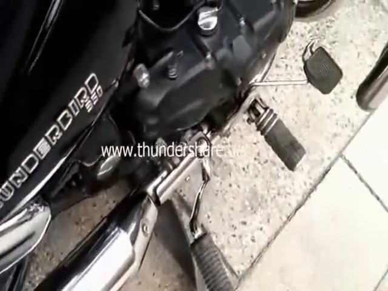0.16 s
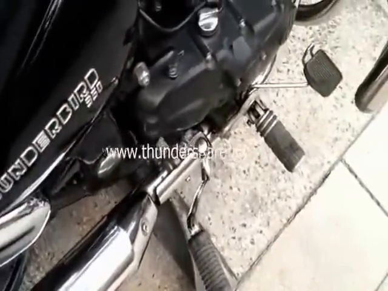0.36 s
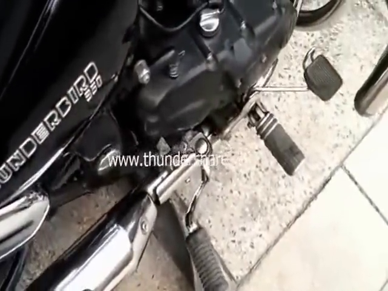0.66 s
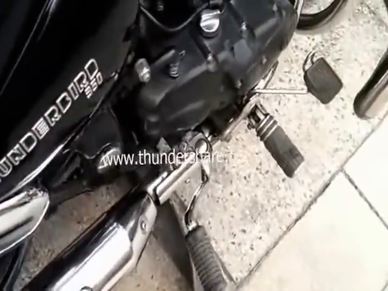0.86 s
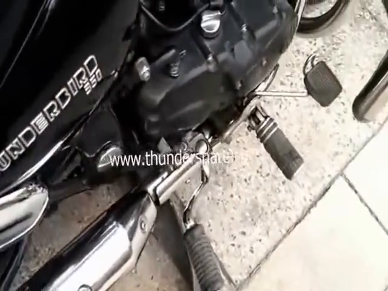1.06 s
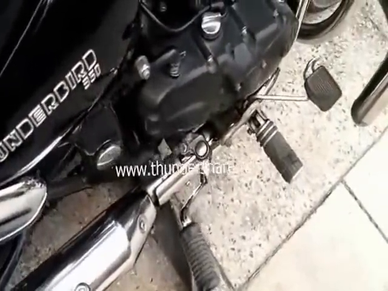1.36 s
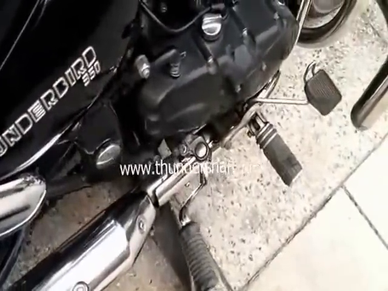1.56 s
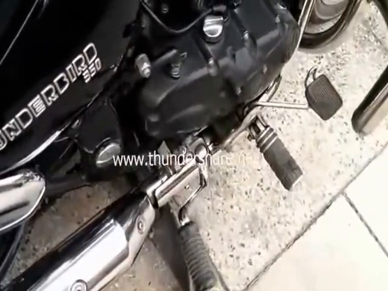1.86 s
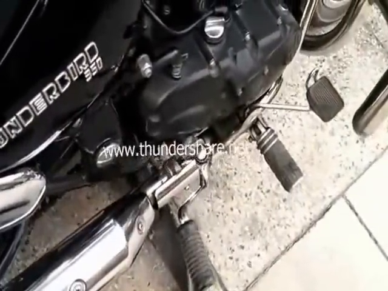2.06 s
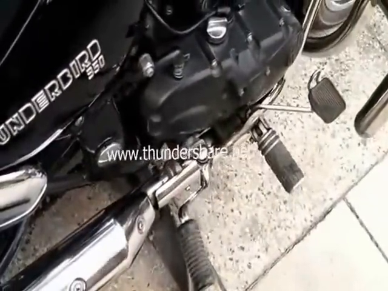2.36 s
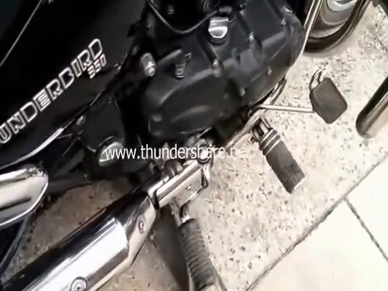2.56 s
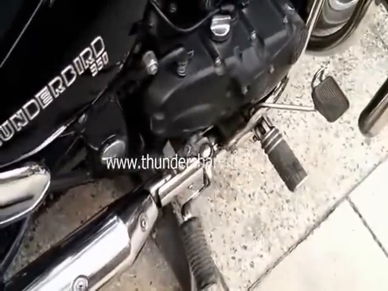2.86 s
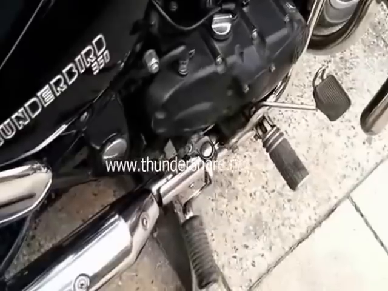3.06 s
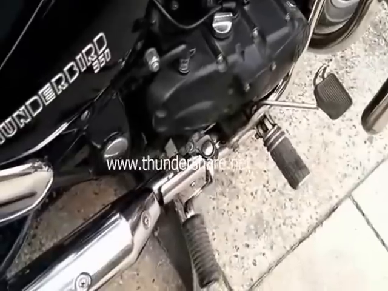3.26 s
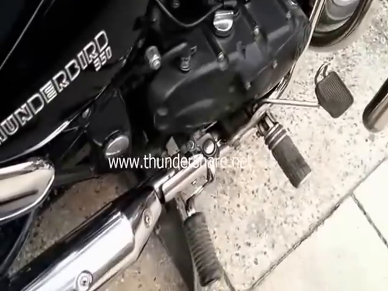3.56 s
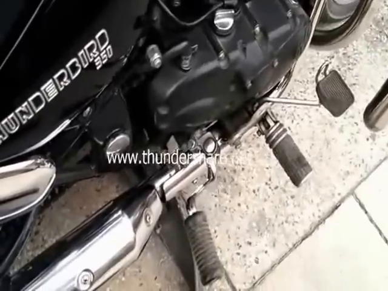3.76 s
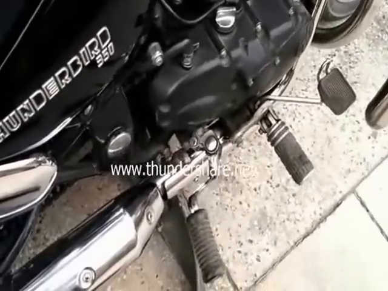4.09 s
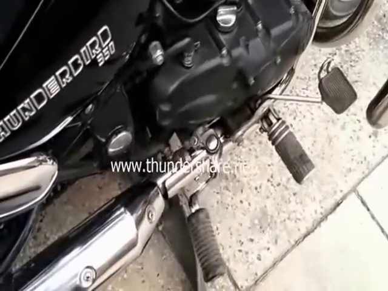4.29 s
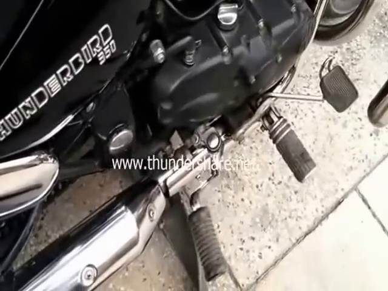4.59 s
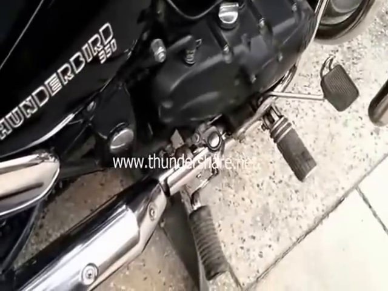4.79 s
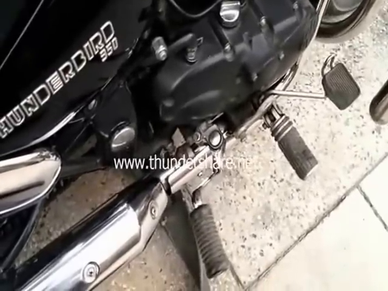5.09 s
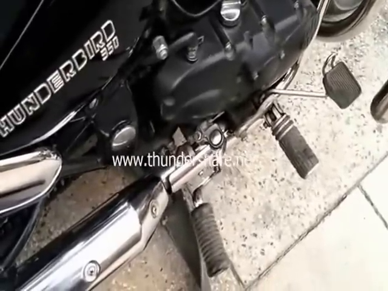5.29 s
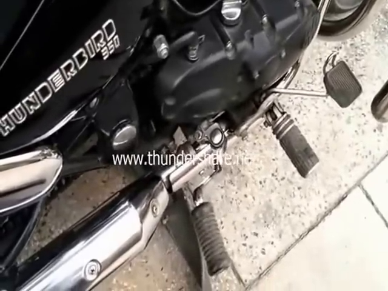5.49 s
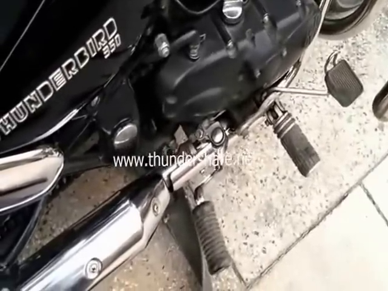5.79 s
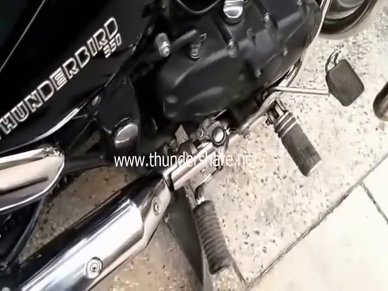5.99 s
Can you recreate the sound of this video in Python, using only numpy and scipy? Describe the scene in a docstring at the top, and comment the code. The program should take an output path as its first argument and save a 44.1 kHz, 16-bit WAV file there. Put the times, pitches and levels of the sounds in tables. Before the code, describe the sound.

Steady but lumpy idling of one large motorcycle cylinder, already running and continuing throughout. Low rounded thumps dominate; over them lie dry knocks, short clacks and a loose crankcase rattle, with gusts of exhaust hiss. The knock hardens and softens over several beats. Between strokes there is low churning and faint airy hiss. Close, dry outdoor sound from a single microphone above the engine, with no revving or stopping.

```python
"""The uneven thump of a motorcycle's single cylinder, a little over five beats a second: it idles cold,
outdoors, with the microphone above the engine. In each four-stroke cycle the firing knocks the cylinder,
the exhaust thumps in the silencer and hisses, then the intake gulps while the valve gear clacks and
rattles the crankcase. Gas pulses ring cavities; metal is shaped noise and decaying modes.
The crank times the knock and the valve gear, so in slow cycles they lie further from the exhaust thump;
intake, frame and hiss follow at fixed delays."""
import sys
import numpy as np
from scipy import signal
from scipy.fft import rfft, irfft, next_fast_len
from scipy.io import wavfile
from scipy.ndimage import uniform_filter1d, map_coordinates

SR = 44100
rng = np.random.default_rng(int(sys.argv[2]) if len(sys.argv) > 2 else 0)


def transcribe(signal):
    """Save signal, clipped to [-1, 1], as a 16-bit WAV file at the path in sys.argv[1]."""
    frames = np.atleast_2d(signal).T
    limited = np.clip(frames, -1, 1)
    pcm = np.round(limited * 32767).astype(np.int16)
    wavfile.write(sys.argv[1], SR, pcm)


N = 270591

# The four-stroke cycles. Each row: exhaust pulse in seconds, then the relative levels in dB of
# the thump, firing knock, valve clack and frame thud.
CYCLES = [(-0.0166, -0.5, -53.5, -45.5, -53), (0.156, -1.5, -45, -41.5, -50.5),
          (0.33, 0.5, -44.5, -44, -47), (0.509, -2, -38.5, -37, -46), (0.6824, -2, -47.5, -43.5, -50),
          (0.9, -0.5, -42, -45, -43.5), (1.0895, -1, -39, -40.5, -48), (1.2639, 1.5, -48.5, -41, -42.5),
          (1.4485, 0, -51.5, -43.5, -49.5), (1.6428, -1, -52.5, -36.5, -48),
          (1.8168, -0.5, -52.5, -38.5, -44.5), (1.9946, -0.5, -58.5, -41, -44),
          (2.1737, -6, -60, -48.5, -48), (2.3936, 0, -62.5, -38, -46.5), (2.5789, 0.5, -45, -40.5, -41),
          (2.7556, 1.5, -40.5, -43, -44), (2.939, 0, -37, -39.5, -44), (3.1184, -8.5, -47.5, -50, -50),
          (3.343, -0.5, -48.5, -42.5, -47), (3.5365, 0.5, -37, -39.5, -44), (3.7113, 0.5, -43, -45, -49),
          (3.907, 0, -45, -39.5, -44), (4.085, 0.5, -47, -42, -47.5), (4.2656, -5, -59.5, -46.5, -51),
          (4.4821, 0, -62.5, -42.5, -42), (4.6668, 0, -62, -47.5, -49), (4.8621, -0.5, -59, -44.5, -48),
          (5.0502, 0.5, -63.5, -40.5, -45.5), (5.2295, 0, -51, -46.5, -46.5), (5.4166, 1, -41, -42.5, -48),
          (5.5936, 0.5, -39, -42.5, -43), (5.7791, 0, -48.5, -43, -50.5), (5.9734, -0.5, -50, -51.5, -48),
          (6.159, 23, -40, -44, -52)]
# Crankcase and cover modes. Each row: frequency in Hz, relative level in dB, 60 dB decay in seconds.
CASE_MODES = [(493, -6, 0.079), (566.7, -8, 0.26), (633, -17, 0.16), (650, -12, 0.18), (785, -5.5, 0.1),
              (1021, -4, 0.17), (1066, 2, 0.062), (1189, -4, 0.083), (1301, -3.5, 0.22),
              (1358.6, 4.5, 0.098), (1467, -27, 0.056), (1661, -1, 0.12), (1670, -17, 0.1),
              (1845, -3.5, 0.14), (1972, -6, 0.081), (2270, -24, 0.39), (2240, -1, 0.03), (2268, -2, 0.079),
              (2260, -54, 0.053), (2774, -11, 0.14), (3160, -21.5, 0.21)]
# Frame and side panel modes. Each row: frequency in Hz, relative level in dB, 60 dB decay in seconds.
FRAME_MODES = [(171.2, 7.5, 0.16), (213.7, -5.5, 0.24), (247.6, -2, 0.13), (284.8, 1, 0.11),
               (355.3, -20, 0.54), (395, -22, 0.17), (439.7, -16.5, 0.34), (515.6, -20, 0.34)]
# Colour of spitting gas and tiny ticks. Each row: frequency in Hz, relative density in dB per Hz.
SPIT_COLOUR = [(2500, 4), (5000, -14), (8000, 0), (11000, 4), (12600, 10), (14000, 6), (15500, -1)]


def thump():
    """The exhaust pushes into the silencer, then the intake sucks on the airbox and the frame shudders."""
    # Silencer resonances. Each row: frequency in Hz, width in Hz, relative level in dB.
    silencer = [(57.3, 26.2, -12.5), (84.7, 35, -9.5), (142.2, 22, -15), (298, 19.8, -7)]
    # Airbox resonances. Each row: frequency in Hz, width in Hz, relative level in dB.
    airbox = [(58.5, 10.8, -20.5), (96.9, 17.4, -5), (117.6, 57, -14)]
    exhaust_width_s, intake_width_s = 0.0013, 0.0025  # standard deviation on the median beat
    s, exhaust_db, *_, thud_db = np.transpose(CYCLES)
    intake_db = 1.2 + 0.23 * exhaust_db - settling(s)
    exhaust = gas_pulses(s, exhaust_db, exhaust_width_s, silencer)
    intake = gas_pulses(s + 0.0404, intake_db, intake_width_s, airbox)
    # while both valves are open a last push of gas precedes the intake
    overlap = gas_pulses(s + 0.0345, intake_db - 16.5, exhaust_width_s, silencer)
    # the frame is jolted by the exhaust stroke, then harder as the load reverses
    jolt = ring(FRAME_MODES, s + 0.0178, thud_db - 2.5, scatter_db=5.5, attack=0.0012)
    shudder = ring(FRAME_MODES, s + 0.041, thud_db + 4.0, scatter_db=5, attack=0.003)
    return exhaust - intake + overlap + jolt + shudder


def firing():
    """Pressure builds, the cold piston slaps the bore and rebounds, and the cylinder rings on."""
    # Colour of the knock. Each row: frequency in Hz, relative density in dB per Hz.
    knock_colour = [(120, -31), (260, -4), (420, 0), (750, 10), (900, 1.5), (1250, 1.5), (1800, 1.5),
                    (2400, -5), (3300, -17.5), (5000, -22.5), (7500, -29.5), (14000, -37)]
    # Brightness of the knocks. Each row: time in seconds, treble over bass in dB.
    knock_tone = [(0.3, -1.5), (0.65, 20), (1.06, 8.5), (1.23, -2), (2.72, -1.5), (2.91, 9), (3.88, 6.5),
                  (5.2, -8.5), (5.56, -1), (5.75, 29.5), (6.13, 13.5)]
    s, db = knocks()
    bright_db = level_at(knock_tone, s)
    metal = patchy(metal_noise(knock_colour)) * chatter(rate=350, depth_db=2.5)

    def envelope(level):
        """A slow build-up of pressure with a sharper blow on top."""
        build_up = bursts(s - 0.011, level - 11.0, rise=0.0033, hold=0.067, t60=0.12)
        blow = bursts(s, level, rise=0.0015, hold=0.016, t60=0.1)
        return build_up + amp(-3.5) * blow

    knock = tilted(metal, envelope, db, bright_db)
    slap = ring(CASE_MODES, s + 0.00103, db - 7, scatter_db=7.5, attack=0.0012)
    rebound = ring(CASE_MODES, s + 0.015, db - 7.5, scatter_db=9, attack=0.0076)
    # at equal level, dull knocks shake the frame most
    shake = ring(FRAME_MODES, s, db - 0.95 * bright_db - 9, scatter_db=3.5, attack=0.0033)
    return knock + slap + rebound + shake


def valve_gear():
    """The valve clacks shut, and the gears rattle as the load reverses."""
    # Colour of the clack. Each row: frequency in Hz, relative density in dB per Hz.
    clack_colour = [(200, 10), (450, -38), (700, 3), (880, -44), (1050, 9.5), (1400, 4.5), (1800, -28),
                    (2400, -7), (2900, -6), (5500, -40), (8000, -42), (15000, -37)]
    # Colour of the rattle. Each row: frequency in Hz, relative density in dB per Hz.
    rattle_colour = [(150, 5), (280, 7), (400, 16), (600, -10), (880, 10), (1100, 21), (1400, 14),
                     (1900, 3), (2350, 19), (2700, 1), (3300, 0), (6000, -57), (12000, -46)]
    # Brightness of clack and rattle. Each row: time in seconds, treble over bass in dB.
    clack_tone = [(0.2, -13), (0.7, 16.5), (3.75, 1.5), (4.0, -14.5), (4.7, -12), (5.3, 6), (6.0, -3.5)]
    s = crank(0.247)  # share of a cycle after the exhaust pulse
    clack_db = np.transpose(CYCLES)[3]
    rattle_db = -48.5 + 0.6 * (clack_db - clack_db.mean())
    bright_db = level_at(clack_tone, s)
    steel = patchy(metal_noise(clack_colour))
    teeth = patchy(metal_noise(rattle_colour))

    def clack_envelope(db):
        """A short clack."""
        return bursts(s - 0.001, db - 3.5, rise=0.0022, hold=0.01, t60=0.1)

    def rattle_envelope(db):
        """A later, slower rattle."""
        return bursts(s + 0.0078, db - 1.5, rise=0.011, hold=0.017, t60=0.23)

    clack = tilted(steel, clack_envelope, clack_db, bright_db)
    rattle = tilted(teeth, rattle_envelope, rattle_db, bright_db)
    case = ring(CASE_MODES, s + 0.00103, clack_db - 6.5, scatter_db=5.5, attack=0.00084)
    # gear teeth cross their backlash a few times, never at quite the same moment
    for delay, db in [(0.013, -28), (0.028, -6), (0.040, -11)]:
        contact_s = s + delay + 0.003 * rng.standard_normal(len(s))
        case += ring(CASE_MODES, contact_s, rattle_db + db, scatter_db=5.0, attack=0.0004)
    return (clack + rattle) * chatter(rate=310, depth_db=3.5) + case


def exhaust_hiss():
    """Gas spits as the valve opens, a tappet ticks, and the stroke hisses on, with a varying bright sizzle."""
    # Colour of the hiss. Each row: frequency in Hz, relative density in dB per Hz.
    hiss_colour = [(300, -11), (700, 1.5), (1400, 9.5), (2900, 2.5), (4400, 9), (5900, 4), (6200, -32),
                   (9000, -4), (15000, -48)]
    # Colour of the sizzle. Each row: frequency in Hz, relative density in dB per Hz.
    sizzle_colour = [(3800, -7), (5300, 1.5), (6000, 2), (6300, -4.5), (6750, 0.5), (7400, -4.5),
                     (7900, -12), (12000, -28)]
    # Course of the hiss. Each row: time in seconds, base level in dB.
    hiss_course = [(0.6, -61), (1.1, -58), (2.55, -54), (2.94, -69.5), (3.35, -57.5), (4.5, -56),
                   (6.0, -65)]
    # Course of the sizzle. Each row: time in seconds, base level in dB.
    sizzle_course = [(0.45, -75), (0.68, -62.5), (1.1, -60.5), (1.27, -67), (1.45, -61), (2.1, -72),
                     (3.3, -74), (3.8, -87), (4.1, -70), (4.65, -60.5), (4.9, -69), (5.5, -63.5),
                     (6.0, -67)]
    s, exhaust_db = np.transpose(CYCLES)[:2]
    hiss_db = level_at(hiss_course, s) + 0.84 * exhaust_db - settling(s)
    sizzle_db = level_at(sizzle_course, s)
    spit_db = -56 + 2.8 * exhaust_db - settling(s)

    tappet = bursts(s + 0.0198, hiss_db + 2.5, rise=0.00063, hold=0.0035, t60=0.033)
    flow = bursts(s - 0.002, hiss_db + 4.0, rise=0.039, hold=0.049, t60=0.21)
    hiss = patchy(metal_noise(hiss_colour)) * (flow + tappet)

    # a hard knock sets off the sizzle early
    knock_s, knock_db = knocks()
    buzz_db = sizzle_db - 2.5 + knock_db - knock_db.mean()
    buzz = bursts(knock_s, buzz_db, rise=0.0018, hold=0.029, t60=0.087)
    stroke = bursts(s - 0.012, sizzle_db + 7, rise=0.014, hold=0.065, t60=0.33)
    sizzle = metal_noise(sizzle_colour) * (buzz + stroke)

    sputter = metal_noise(SPIT_COLOUR) * chatter(rate=250, depth_db=3.5)
    spit = sputter * bursts(s - 0.004, spit_db, rise=0.0028, hold=0.0063, t60=0.21)
    return (hiss + sizzle) * chatter(rate=280, depth_db=3) + spit


def spits_and_ticks():
    """Loud treble spits and tiny ticks as bursts of noise; a small fitting pings once as a decaying mode."""
    # Loud bright spits of gas. Each row: start in seconds, level in dB before a 2 dB cut,
    # 60 dB decay in seconds.
    loud_spits = [(0.33, -55, 0.12), (1.264, -50.5, 0.15), (2.273, -43.5, 0.2), (3.709, -47.5, 0.41)]
    # Tiny ticks. Each row: start in seconds, level in dB.
    tick_rows = [(1.4506, -49), (3.0345, -51.5), (3.159, -52), (3.2211, -52)]
    # Colour of the loud spits. Each row: frequency in Hz, relative density in dB per Hz.
    loud_spit_colour = [(4000, -3.5), (6000, -3), (8400, 4.5), (10000, -0.5), (12500, 7), (15500, -4.5)]
    puffs = np.zeros(N)
    for start, level, life in loud_spits:
        puffs += bursts([start], [level - 2], rise=0.00054, hold=0.024, t60=life)
    tick_s, tick_db = np.transpose(tick_rows)
    ticks = bursts(tick_s, tick_db, rise=0.0003, hold=0.002, t60=0.025)
    # the fitting pings on a hard knock; its mode: Hz, dB, 60 dB decay in seconds
    fitting = [(7300, 0, 0.16)]
    ping = ring(fitting, [2.918], [-51], scatter_db=0, attack=0.0035)
    return noise(loud_spit_colour) * puffs + noise(SPIT_COLOUR) * ticks + ping


def background():
    """The engine's churn sinks as compression slows the crank; under it lies a slowly varying thin hiss."""
    # Colour of the churn. Each row: frequency in Hz, relative density in dB per Hz.
    murmur_colour = [(25, -49), (90, 6.5), (280, -3), (400, -8), (600, -8), (900, -15), (1200, -13),
                     (1800, -21), (2300, -23.5), (3300, -23.5), (7000, -37)]
    # Colour of the high hiss. Each row: frequency in Hz, relative density in dB per Hz.
    air_colour = [(2000, -35), (5000, -0.5), (6400, -0.5), (6720, 6), (7000, -6.5), (7900, 2.5),
                  (8600, 1.5), (10500, 3), (12000, 2), (12600, 11.5), (13200, 0.5), (15500, -2.5)]
    # Course of the high hiss. Each row: time in seconds, level in dB before a 1.5 dB cut.
    air_course = [(0.0, -70.5), (1.1, -63), (2.25, -65), (2.5, -62), (3.4, -61), (3.9, -57.5), (4.6, -60.5),
                  (6.14, -61.5)]
    s = np.transpose(CYCLES)[0]
    swell = bursts(s - 0.02, np.full(len(s), -57), rise=0.052, hold=0.12, t60=0.11)
    churn = (amp(-59) + swell) * noise(murmur_colour) * chatter(rate=99, depth_db=3)
    air_db = level_at(air_course, np.arange(N) / SR) - 1.5
    return churn + amp(air_db) * metal_noise(air_colour)


def crank(turn):
    """The moment in every cycle that lies this share of a cycle after the exhaust pulse."""
    s = np.transpose(CYCLES)[0]
    lengths = np.diff(s)
    # a lag is a share of the cycle that follows, a lead of the one before
    cycle = np.r_[lengths, lengths[-1]] if turn > 0 else np.r_[lengths[0], lengths]
    return s + turn * cycle


def knocks():
    """Time and level of every firing knock, ahead of the exhaust pulse; soft ones come a little earlier."""
    db = np.transpose(CYCLES)[2]
    early_s_per_db = 0.000304
    return crank(-0.182) + early_s_per_db * (db - db.mean()), db


def settling(s):
    """How many dB the gas flow still lacks at the times s, just after the start."""
    cold_db, settle_s = 3, 0.68
    return cold_db * np.exp(-s / settle_s)


def level_at(curve, s):
    """Read a curve of (seconds, dB) rows at the times s."""
    return np.interp(s, *np.transpose(curve))


def gas_pulses(times, levels_db, width, modes):
    """Smooth pressure pulses, blunter when weak, ring a cavity, with a run-up before time zero."""
    lead = SR // 4
    t = np.arange(-SR // 50, SR // 50) / SR
    pressure = np.zeros(N + lead)
    for s, db in zip(times, levels_db):
        spread = np.exp(0.026 * (np.median(levels_db) - db))
        pulse = np.exp(-0.5 * (t / (width * spread)) ** 2)
        add(pressure, s + lead / SR + t[0], amp(db) / spread * pulse)
    return resonate(pressure, modes)[lead:]


def resonate(x, modes):
    """x through cavity resonances (Hz, width in Hz, dB), alternating in sign."""
    def response(f):
        """Sum of the band-pass resonances."""
        total = 0
        for k, (centre, width, db) in enumerate(modes):
            damping = 1j * f * width
            total = total + (-1) ** k * amp(db) * damping / (centre ** 2 - f ** 2 + damping)
        return total

    return filtered(x, response)


def ring(table, times, levels_db, scatter_db, attack):
    """Each blow shares its energy anew among the modes (Hz, dB, 60 dB decay in seconds)."""
    t = np.arange(SR // 6) / SR
    out = np.zeros(N)
    hz, db, t60 = np.transpose(table)[:, :, None]
    modes = amp(db - 60 * t / t60) * np.exp(2j * np.pi * hz * t) * (1 - np.exp(-t / attack))
    for s, level in zip(times, levels_db):
        strength = amp(scatter_db * rng.standard_normal(len(table)))
        strength = strength * np.exp(2j * np.pi * rng.random(len(table)))  # random phases
        strength *= np.linalg.norm(amp(db)) / np.linalg.norm(strength * amp(db[:, 0]))
        add(out, s, amp(level) * (strength @ modes).real)
    return out


def bursts(times, levels_db, rise, hold, t60):
    """An envelope that rises, holds and dies away at each time (all in seconds)."""
    t = np.arange(SR // 3) / SR
    envelope = np.zeros(N)
    for s, db in zip(times, levels_db):
        decay_db = 60 * np.maximum(t - hold, 0) / t60
        add(envelope, s, (1 - np.exp(-t / rise)) * amp(db - decay_db))
    return envelope


def chatter(rate, depth_db):
    """Fast random gain of rms 1: parts touch in many small contacts, none far above the rest."""
    knots = 2 * np.tanh(rng.standard_normal(int(N * rate / SR) + 4) / 2)
    wander = map_coordinates(knots, [np.arange(N) * rate / SR], order=1)
    return unit(amp(depth_db * wander))


def patchy(x):
    """Every blow lands a little differently: the colour shifts from moment to moment."""
    z = signal.stft(x, nperseg=512)[2]
    field = uniform_filter1d(rng.standard_normal(z.shape), size=4, axis=0)
    field = uniform_filter1d(field, size=7, axis=1)
    gain = amp(1.5 * unit(field))
    return unit(signal.istft(z * gain, nperseg=512)[1][:N])


def tilted(x, envelope, db, bright_db):
    """x under envelope(levels), its parts below and above 1.5 kHz tipped by each blow's brightness."""
    low = filtered(x, lambda hz: 1 / (1 + (hz / 1500) ** 4))
    return low * envelope(db - 0.5 * bright_db) + (x - low) * envelope(db + 0.5 * bright_db)


def metal_noise(colour):
    """Noise heard through the dense, fixed resonances of cast and sheet metal."""
    grid = np.arange(0, SR / 2, 45)  # Hz
    ripple_db = 3 * rng.standard_normal(len(grid)) * np.clip(grid / 3000, 0, 1)
    return unit(filtered(noise(colour), lambda hz: amp(np.interp(hz, grid, ripple_db))))


def noise(colour):
    """Noise of rms 1 with a spectrum of (Hz, dB) rows."""
    f, db = np.transpose(colour)
    white = rng.standard_normal(N)
    return unit(filtered(white, lambda hz: amp(np.interp(np.log(hz + 1), np.log(f), db))))


def filtered(x, response):
    """x times a complex response of frequency, padded so that tails do not wrap round."""
    size = next_fast_len(len(x) + SR // 2)
    spectrum = rfft(x, size) * response(np.fft.rfftfreq(size, 1 / SR))
    return irfft(spectrum, size)[:len(x)]


def add(track, s, sound):
    """Mix a sound into the track from time s, cut at both ends of the track."""
    start = round(s * SR)
    part = sound[max(-start, 0):max(len(track) - start, 0)]
    track[max(start, 0):][:len(part)] += part


def amp(db):
    """Decibels to gain."""
    return 10 ** (np.asarray(db) / 20)


def unit(x):
    """Scale to rms 1."""
    return x / np.sqrt(np.mean(x ** 2) + 1e-20)


def scene():
    """All parts of the idling engine, in mono."""
    engine = thump() + firing() + valve_gear() + exhaust_hiss()
    return (engine + spits_and_ticks() + background())[None]


def record(dry):
    """The microphone channel keeps nothing above its band limit."""
    top_hz = 15520
    return np.array([filtered(channel, lambda hz: hz < top_hz) for channel in dry])


dry = scene()
out = record(dry)
transcribe(out)
```